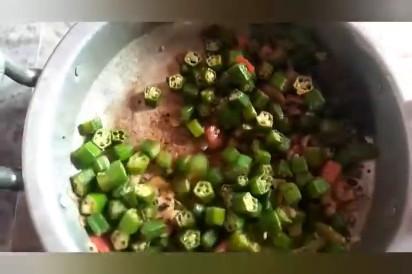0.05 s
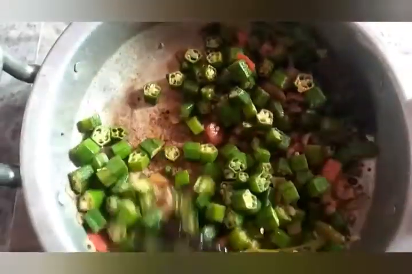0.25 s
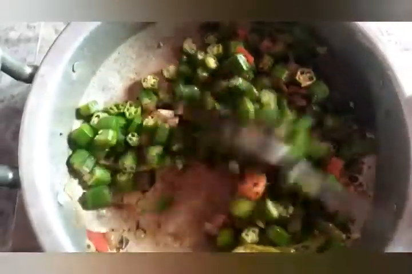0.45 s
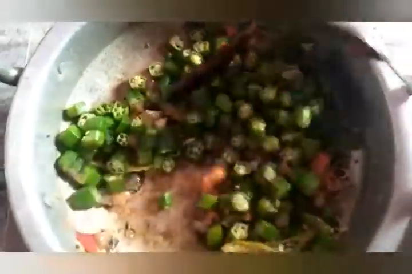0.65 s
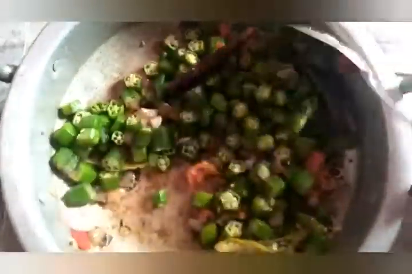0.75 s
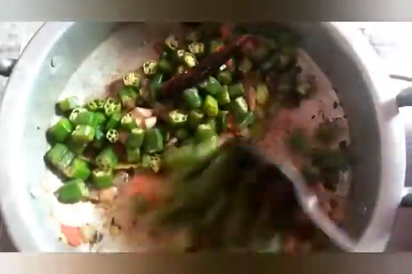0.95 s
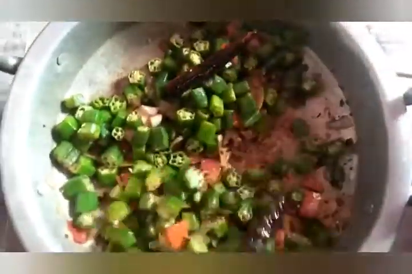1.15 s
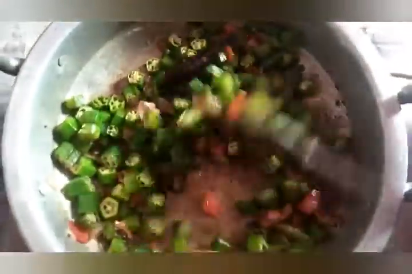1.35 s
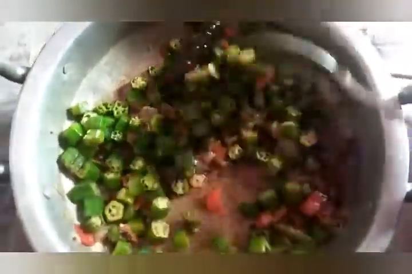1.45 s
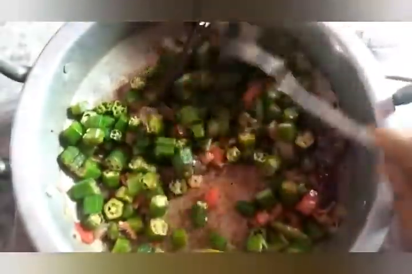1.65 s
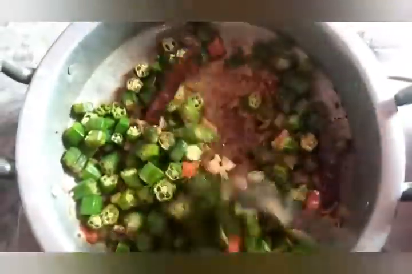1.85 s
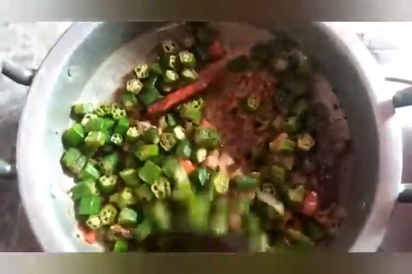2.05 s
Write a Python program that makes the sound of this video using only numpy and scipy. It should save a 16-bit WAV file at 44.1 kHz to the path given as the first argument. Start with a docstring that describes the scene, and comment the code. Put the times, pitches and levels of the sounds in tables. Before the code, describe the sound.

A metal spoon clanks and scrapes in a wide metal pan, first in a quick pair, then a cluster, then one softer knock; okra pieces plop, oil sizzles faintly, close microphone in a small kitchen.

```python
"""A steel spoon stirs chopped okra in a wide metal pan, close by in a small kitchen.
Each blow is a burst of chatter and a hollow knock that set damped modes of pan and spoon ringing.
Scrapes, tumbling okra and the pan shifting on the burner are coloured trains of tiny impulses;
single pieces land as filtered clicks. Oil sizzles faintly as flickering grains over a low rumble,
and sinks away for a moment near the end."""
import sys
import numpy as np
from scipy import signal
from scipy.fft import rfft, irfft, next_fast_len
from scipy.io import wavfile

SR = 44100
rng = np.random.default_rng(int(sys.argv[2]) if len(sys.argv) > 2 else 0)


def transcribe(u):
    """Save the signal u as a 16-bit wav file named by the first command-line argument.

    u: samples, shape (n,) or (channels, n), limited to [-1, 1]; the rate is SR.
    q: integer samples, one column per channel.
    """
    v = np.clip(np.atleast_2d(u).T, -1, 1)
    q = np.round(v * 32767).astype(np.int16)
    wavfile.write(sys.argv[1], SR, q)


N = 92610
T = np.arange(SR // 2) / SR  # time axis of one contact, seconds


def amp(db):
    """Decibels to gain."""
    return 10 ** (np.asarray(db) / 20)


def unit_rms(x):
    """Scale to rms 1."""
    return x / np.sqrt(np.mean(x ** 2) + 1e-20)


def unit_energy(x):
    """Scale to energy 1."""
    return x / np.sqrt(np.sum(x ** 2) + 1e-20)


def along(points, hz):
    """Read a curve of (Hz, value) points on a log frequency axis."""
    point_hz, values = np.transpose(points)
    return np.interp(np.log(hz + 1), np.log(point_hz + 1), values)


def fade(t60):
    """Exponential decay that falls 60 dB in t60 seconds."""
    return np.exp(-np.log(1000) * T / t60)


def coloured(x, gain_db):
    """Pass x through a causal minimum-phase filter whose gain in dB is a function of frequency."""
    size = 8192
    cepstrum = irfft(gain_db(np.fft.rfftfreq(size, 1 / SR)) * np.log(10) / 20)
    # Folding the cepstrum onto positive time makes the filter causal.
    cepstrum[1:size // 2] *= 2
    cepstrum[size // 2 + 1:] = 0
    impulse_response = irfft(np.exp(rfft(cepstrum)))
    return signal.fftconvolve(x, impulse_response)[:len(x)]


def add(track, start_s, sound):
    """Mix a sound into the track from start_s."""
    part = track[round(start_s * SR):][:len(sound)]
    part += sound[:len(part)]


def grains(per_s, spread_db):
    """Tiny impulses at random times, of random sign and uneven size."""
    hits = rng.random(N) < per_s / SR
    signs = rng.choice([-1, 1], N)
    sizes = amp(spread_db * np.clip(rng.standard_normal(N), -2, 2))
    return hits * signs * sizes


def gestures(rows, edge_s=0.0031):
    """Envelope of movements that swell or ebb between soft edges."""
    t = np.arange(N) / SR
    power = np.zeros(N)
    for start, end, level_db, swell_db in rows:
        gate = np.clip(np.minimum(t - start, end - t) / edge_s + .5, 0, 1)
        progress = np.clip((t - start) / (end - start), 0, 1)
        power += gate * amp(level_db + swell_db * (progress - .5)) ** 2
    return np.sqrt(power)


# Sizzle loudness over time. Each row: time in seconds, level in dB.
SIZZLE_LEVEL = [(0, -45), (.2, -46), (.5, -44.5), (.7, -46.5), (1.0, -44.5), (1.15, -47), (1.33, -44.5),
                (1.44, -47), (1.52, -50.5), (1.65, -53.5), (1.725, -54), (1.756, -66.5), (1.772, -55.5),
                (1.81, -51), (1.83, -51.5), (1.89, -43.5), (1.99, -50.5), (2.074, -55), (2.092, -45)]
# Colour of the hiss. Each row: frequency in Hz, gain in dB.
SIZZLE_COLOUR = [(60, -25), (150, -4), (320, -1.5), (480, -6.5), (850, -0.5), (1600, -3), (2270, 3),
                 (3200, 3), (4300, -4.5), (5200, -14.5), (7000, -10.5), (8700, -8), (12000, -12.5),
                 (15500, -10)]
# Colour of the kitchen rumble. Each row: frequency in Hz, gain in dB.
RUMBLE_COLOUR = [(20, -25), (48, -14), (70, -1.5), (110, -3.5), (200, -13.5), (330, -11), (600, -16.5),
                 (3000, -57)]


def background(flutter_db=1.0, flutter_per_s=160, rumble_db=-62):
    """A fine hiss of tiny bursting bubbles in spurts, over a low rumble that partly sinks with it."""
    level_db = np.interp(np.arange(N) / SR, *np.transpose(SIZZLE_LEVEL))
    hiss = unit_rms(coloured(grains(7000, spread_db=4), lambda f: along(SIZZLE_COLOUR, f)))
    spurts = np.interp(np.arange(N) * flutter_per_s / SR, np.arange(1000), rng.standard_normal(1000))
    sizzle = amp(level_db + flutter_db * spurts) * hiss
    rumble = unit_rms(coloured(rng.standard_normal(N), lambda f: along(RUMBLE_COLOUR, f)))
    # The rumble dips half as many dB as the sizzle, starting from rumble_db at the sizzle's loudest.
    rumble_level_db = rumble_db + .5 * (level_db - level_db.max())
    return sizzle + amp(rumble_level_db) * rumble


def ringing(modes):
    """Sum of damped sines scaled to energy 1, levels a little different and phases random each time."""
    ring = np.zeros(len(T))
    for hz, level_db, t60 in modes:
        tone = np.sin(2 * np.pi * (hz * T + rng.random()))
        ring += amp(level_db + rng.normal(0, 1)) * fade(t60) * tone
    return unit_energy(ring)


# Clear modes of the pan. Each row: frequency in Hz, relative level in dB, t60 in seconds.
PAN_MODES = [(332.6, 3.5, 0.54), (386, -5, 0.64), (517, -9, 0.42), (630.6, 4.5, 0.39), (735, 4.5, 0.28),
             (807.4, 5, 0.44), (1078, 8, 0.21), (1130, -13.5, 0.27), (1242, 6.5, 0.28), (1400, -4, 0.074),
             (1500, -2, 0.31), (1535, -10, 0.065), (1720, 0, 0.15), (1780, -4, 0.62), (2010, -4, 0.28),
             (2200, 3, 0.14), (2263, 3, 0.4), (2614, -16, 0.081), (3170, -9, 0.086), (3460, -21, 0.088)]
# Decay of the crowded modes and kitchen walls. Each row: frequency in Hz, t60 in seconds.
DENSE_RING = [(200, 0.32), (1200, 0.22), (3000, 0.23), (6000, 0.2), (15000, 0.048)]


def pan_ring(dense_db=-0.5, modes_db=-13):
    """The pan's answer to a contact: clear damped modes in a noise that decays band by band."""
    hz, t, bands = signal.stft(rng.standard_normal(len(T)), SR, nperseg=256)
    decay = np.exp(-np.log(1000) * t / along(DENSE_RING, hz)[:, None])
    dense = signal.istft(bands * decay, SR, nperseg=256)[1][:len(T)]
    return amp(dense_db) * unit_energy(dense) + amp(modes_db) * ringing(PAN_MODES)


def in_pan(force, ring_db):
    """A contact force together with the ring it leaves in the pan."""
    return force + amp(ring_db) * signal.fftconvolve(force, pan_ring())[:len(force)]


# Spoon on pan. Each row: start in seconds, relative level in dB, then bass, low-mid, clank and tick
# tone in dB, first contact in dB, chatter length in seconds, knock pitch in Hz, then relative levels
# of knock, pan ring and spoon ring in dB.
BLOWS = [(0.2272, -3.5, -15, -11.5, 0.5, 5, -9.5, .004, 1660, -2, -7, 3.5),
         (0.331, 3.5, -3, -0.5, -7, -9.5, -8.5, 0.011, 1072, -1, -4.5, -7.5),
         (0.7502, -5.5, -5, -17, -7, -0.5, -3.5, 0.0082, 1120, -1.5, -11, -6.5),
         (0.8225, 0.5, -8.5, 0, -0.5, -6, -3.5, 0.0029, 900, -6, -5.5, -9.5),
         (0.8796, -13.5, -18, -6, 1.5, -12, -10, 0.0098, 1755, 3, 0, -3),
         (1.3394, -13, 8.5, -2, 4.5, -2, -5.5, 0.0077, 1062, 4.5, -12, -28)]
# Centres of bass, low-mid, body, clank and tick: one column, in Hz.
TONE_HZ = [300, 520, 1100, 2400, 6500]
# Colour shared by all blows. Each row: frequency in Hz, gain in dB.
BLOW_COLOUR = [(30, -44), (140, -18), (220, -9), (310, -0.5), (480, -6.5), (850, -9.5), (1150, -1),
               (2200, -2), (3500, -7), (4800, -23), (8000, -21.5), (15500, -30.5)]
# Bending modes of the spoon. Each row: frequency in Hz, relative level in dB, t60 in seconds.
SPOON_MODES = [(714, 5.5, 0.1), (1236, 3, 0.045), (1602, -7.5, 0.21), (1763, -1.5, 0.017),
               (2048, -6.5, 0.25), (2460, -0.5, 0.12), (3130, -4.5, 0.11), (3530, 2.5, 0.061)]


def spoon_blows(level_db=22, chatter_db=-3.5, knock_gain_db=-14, spoon_gain_db=-9):
    """The spoon lands and chatters for a few ms with a hollow knock; then spoon and pan ring on."""
    out = np.zeros(N)
    # The pan's floor gives with a short thump.
    floor_hz, floor_db, floor_t60 = 306.4, -23.5, 0.03
    for (start, blow_db, bass_db, low_mid_db, clank_db, tick_db, contact_db, length,
         knock_hz, knock_db, pan_db, spoon_db) in BLOWS:
        touch = np.exp(-(T / length) ** 4)
        force = amp(chatter_db) * unit_energy(rng.choice([-1, 1], len(T)) * touch)
        force[0] -= amp(contact_db)
        knock = amp(knock_db + knock_gain_db) * unit_energy(-np.sin(2 * np.pi * knock_hz * T) * touch)
        thump = amp(floor_db) * unit_energy(-np.sin(2 * np.pi * floor_hz * T) * fade(floor_t60))
        ring = amp(pan_db) * pan_ring() + amp(spoon_db + spoon_gain_db) * ringing(SPOON_MODES)
        tone = list(zip(TONE_HZ, [bass_db, low_mid_db, 0, clank_db, tick_db]))
        blow = coloured(force + knock + thump + ring, lambda f: along(BLOW_COLOUR, f) + along(tone, f))
        add(out, start, amp(blow_db + level_db) * blow)
    return out


THUDS_PER_S = 400  # impulses per second in tumbles and pan shifts
# Soft thuds of okra turning over, and the pan's low hum after a blow.
# Each row: start and end in seconds, relative level in dB, swell in dB.
TUMBLES = [(.24, .3, -40, -2), (.39, .45, -39, -7), (.76, .82, -35.5, -3), (.885, .95, -34.5, -15.5),
           (.99, 1.065, -35, -5.5), (1.065, 1.11, -53, -9), (1.11, 1.33, -55, 4), (1.35, 1.39, -40, 16),
           (1.395, 1.63, -61.5, 12)]
# Colour of the soft thuds. Each row: frequency in Hz, gain in dB.
THUD_COLOUR = [(40, -22.5), (150, -12.5), (220, -11), (280, 4.5), (450, -8), (700, -13), (1200, -15),
               (3000, -40), (6000, -35)]


def okra_tumbles():
    """Okra turning over, and the pan's hum after a blow: runs of soft thuds that the pan answers."""
    thuds = unit_rms(coloured(grains(THUDS_PER_S, spread_db=0), lambda f: along(THUD_COLOUR, f)))
    return in_pan(thuds * gestures(TUMBLES), ring_db=-4.5) * amp(-5)


# Pieces landing. Each row: start in seconds, relative level in dB, brightness in dB per octave.
DROPS = [(0.3033, -8, -1), (0.393, -10, 2), (.8545, -6.5, 3), (.9655, -10.5, 2.5), (0.9919, -2.5, -0.5),
         (1.015, -5, 0.5), (1.187, -16.5, -0.5), (1.266, -32.5, 12.5), (1.407, -19, 6), (1.591, -37, 4),
         (1.662, -27.5, 1.5), (1.988, -29.5, 4)]
# Colour of a landing piece. Each row: frequency in Hz, gain in dB.
PLOP_COLOUR = [(50, -55), (150, -24.5), (300, -6), (900, -3.5), (2000, -11.5), (3500, -18.5), (5000, -43),
               (15000, -44)]


def okra_drops(level_db=16):
    """Single pieces land more sharply: a click and its pan ring, tilted darker or brighter."""
    out = np.zeros(N)
    for start, drop_db, bright_db in DROPS:
        hit = in_pan(1. * (T == 0), ring_db=-7)

        def colour(f):
            """Plop colour plus a tilt around 800 Hz that levels off below 200 and above 3000 Hz."""
            return along(PLOP_COLOUR, f) + bright_db * np.log2(np.clip(f, 200, 3000) / 800)

        add(out, start, amp(drop_db + level_db) * coloured(hit, colour))
    return out


# Spoon strokes. Each row: start and end in seconds, relative level in dB, swell in dB.
STROKES = [(.36, .445, -36.5, 5.5), (.445, .472, -30.5, -6), (.835, .915, -44, 9), (.915, 1.04, -50, -10),
           (1.35, 1.385, -35, -10.5), (1.385, 1.413, -31, -5), (1.413, 1.46, -55, -3)]
# Colour of the scrape. Each row: frequency in Hz, gain in dB.
SCRAPE_COLOUR = [(100, -33), (300, 5.5), (600, -6.5), (1100, 10), (2000, 6), (3500, 6.5), (5000, -14),
                 (8000, -6.5), (15500, -18.5)]


def spoon_scrapes(slips_per_s=1800):
    """The spoon's edge catches and slips on the metal in a dense run of impulses that the pan answers."""
    slips = unit_rms(coloured(grains(slips_per_s, spread_db=3), lambda f: along(SCRAPE_COLOUR, f)))
    return in_pan(slips * gestures(STROKES), ring_db=-7) * amp(-3)


# Pan shifting on the burner. Each row: start and end in seconds, level in dB, swell in dB.
SHIFTS = [(.99, 1.13, -52.5, -14)]
# Colour of a shift. Each row: frequency in Hz, gain in dB.
SHIFT_COLOUR = [(30, -33), (70, 5), (120, 1), (200, 1), (400, -8), (1500, -57)]


def pan_shifts():
    """The pan shifts on the burner: low, uneven thuds without ring."""
    thuds = unit_rms(coloured(grains(THUDS_PER_S, spread_db=7), lambda f: along(SHIFT_COLOUR, f)))
    return gestures(SHIFTS) * thuds


def scene():
    """Everything at one microphone above the pan."""
    spoon = spoon_blows() + spoon_scrapes()
    okra = okra_tumbles() + okra_drops()
    return (background() + spoon + okra + pan_shifts())[None]


def record(dry, ceiling=0.78, top_hz=15620):
    """The sharpest peaks are rounded off; nothing is kept above the band limit."""
    rounded = dry / (1 + (dry / ceiling) ** 4) ** (1 / 4)
    size = next_fast_len(N + SR // 2)
    kept = np.fft.rfftfreq(size, 1 / SR) < top_hz
    return irfft(rfft(rounded, size) * kept, size)[..., :N]


dry = scene()
out = record(dry)
transcribe(out)
```